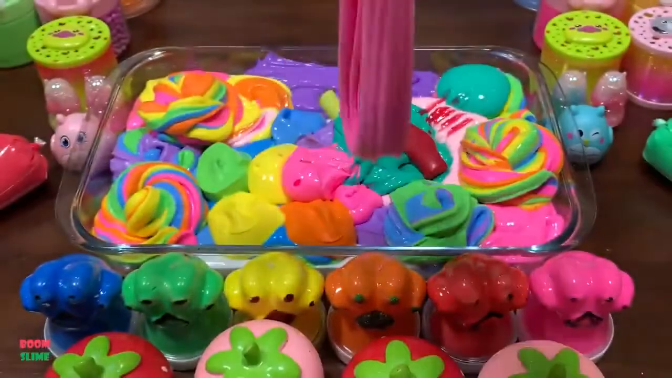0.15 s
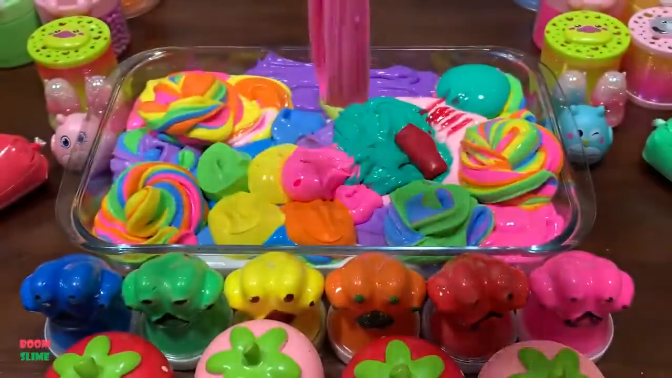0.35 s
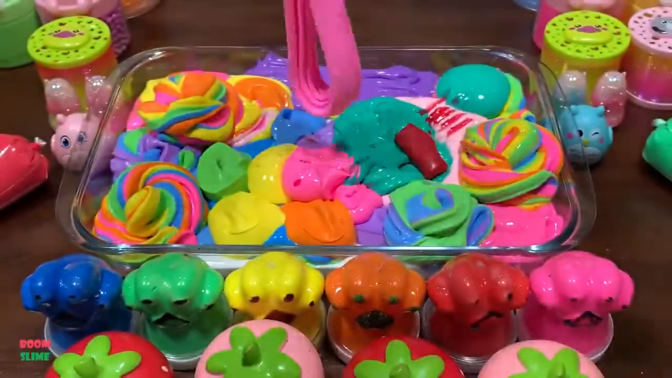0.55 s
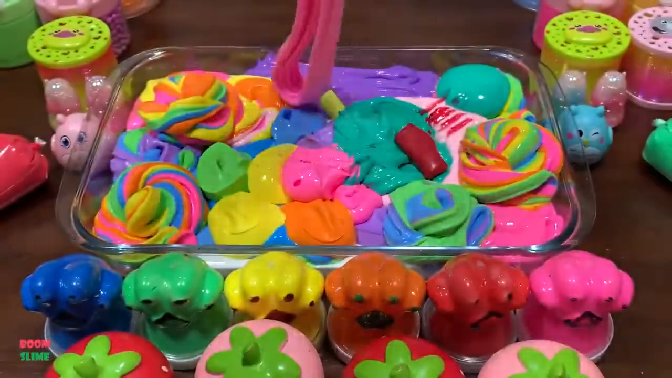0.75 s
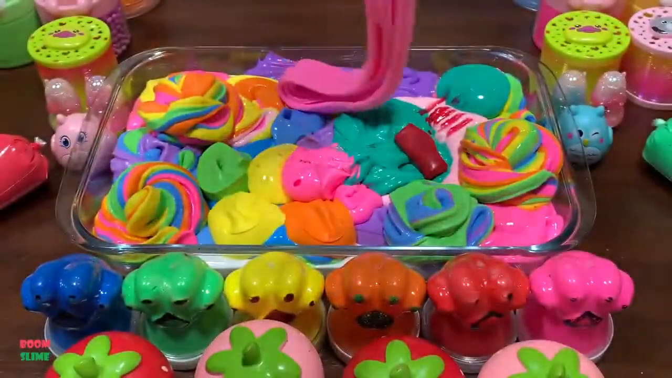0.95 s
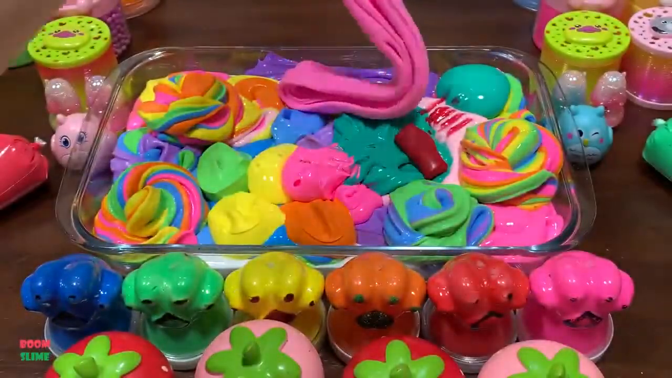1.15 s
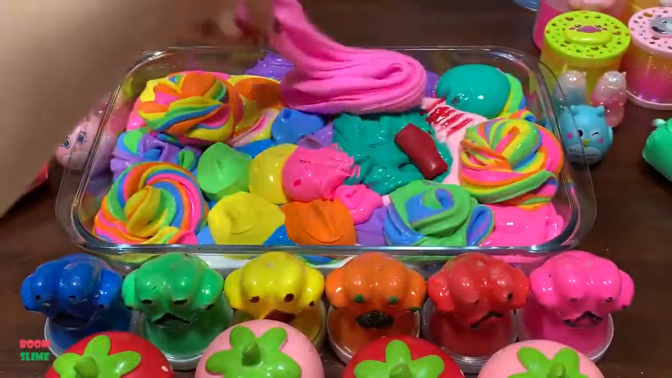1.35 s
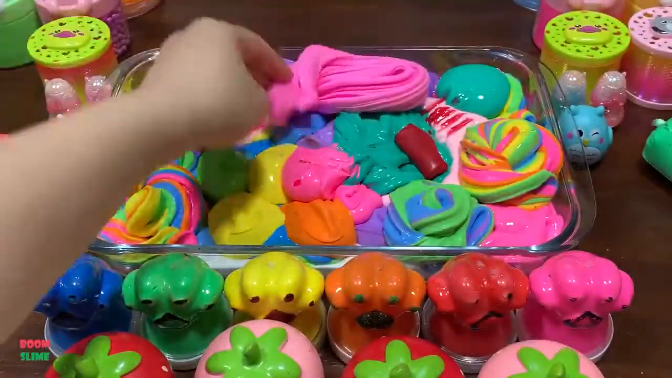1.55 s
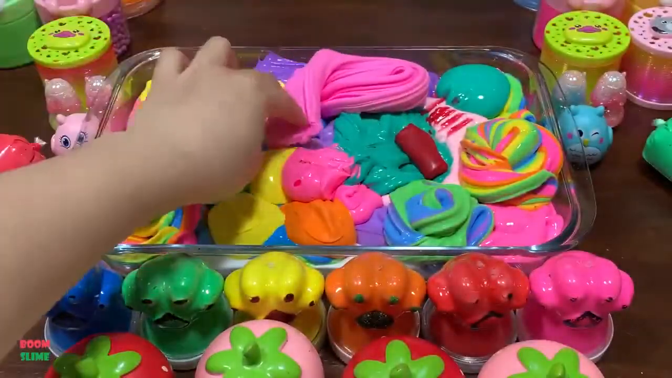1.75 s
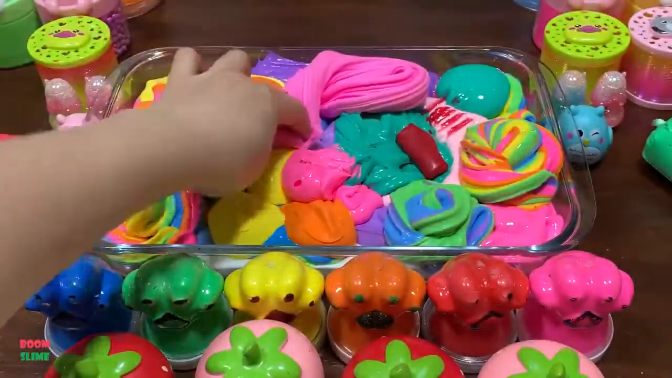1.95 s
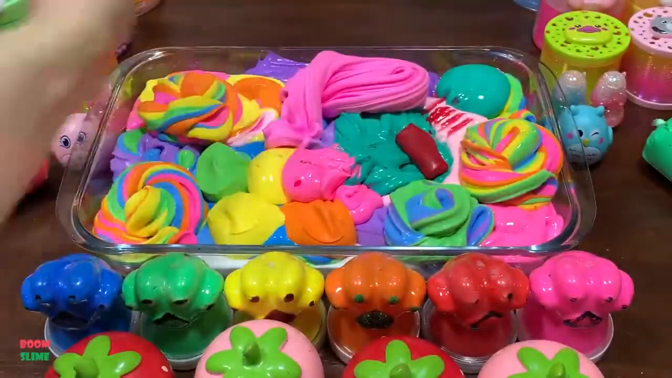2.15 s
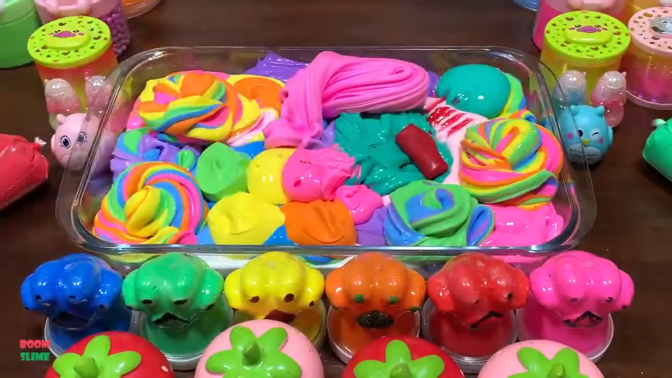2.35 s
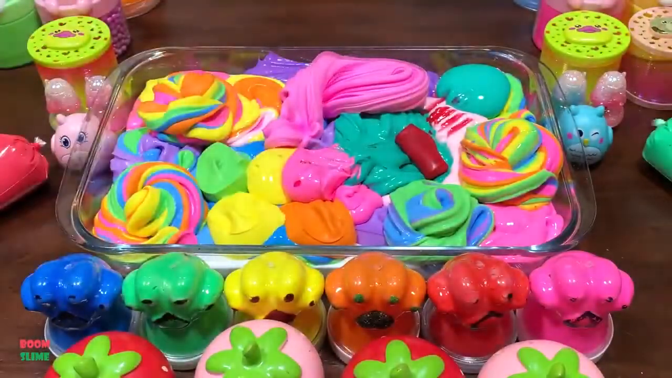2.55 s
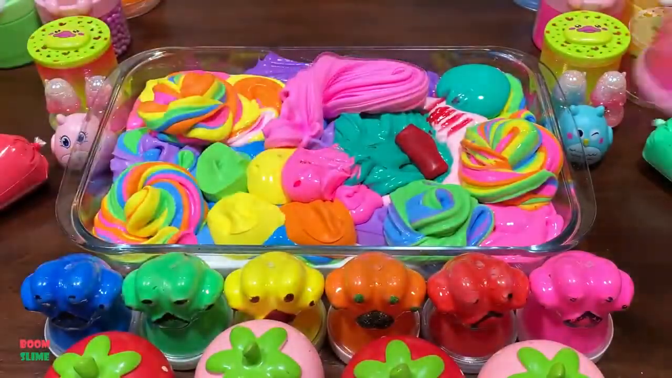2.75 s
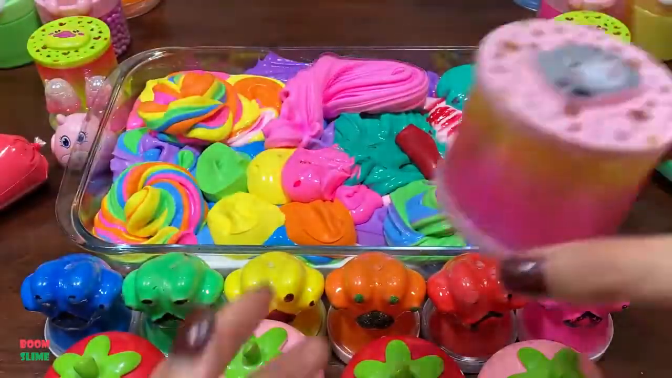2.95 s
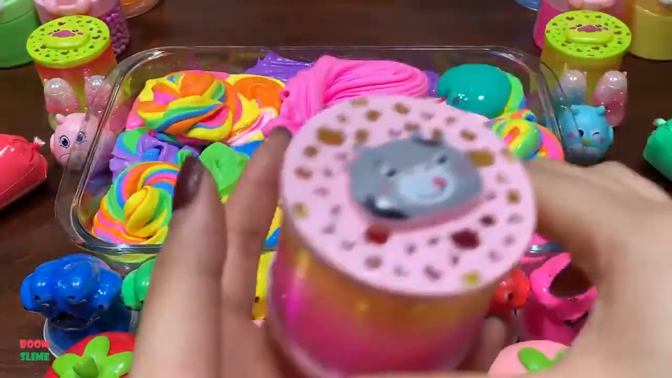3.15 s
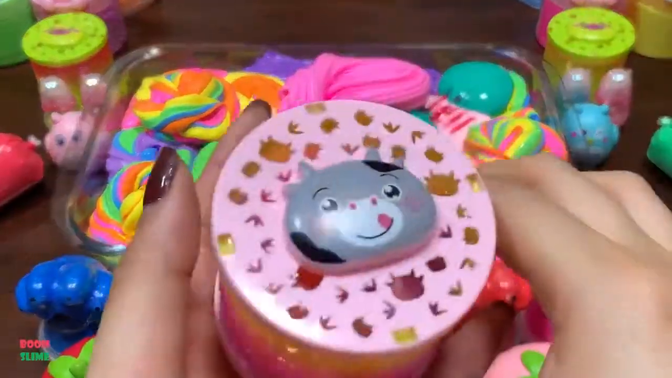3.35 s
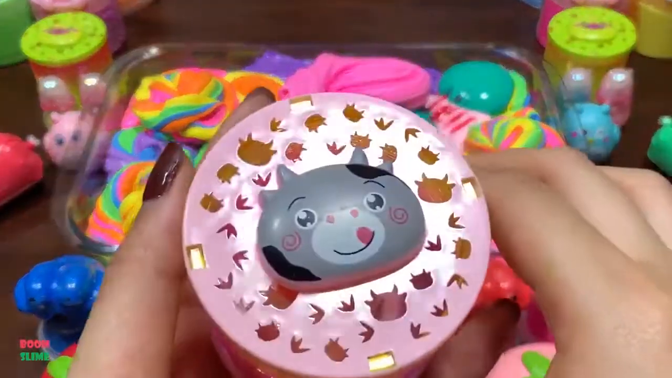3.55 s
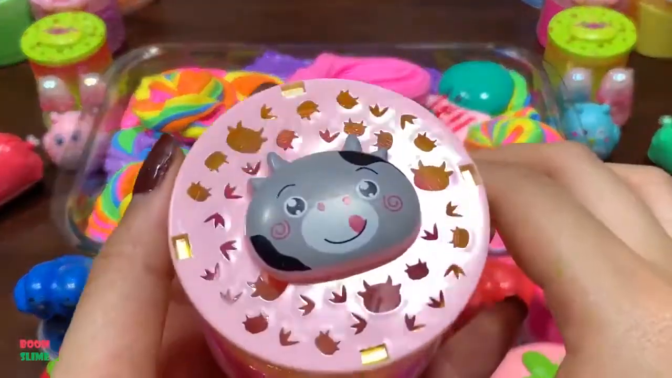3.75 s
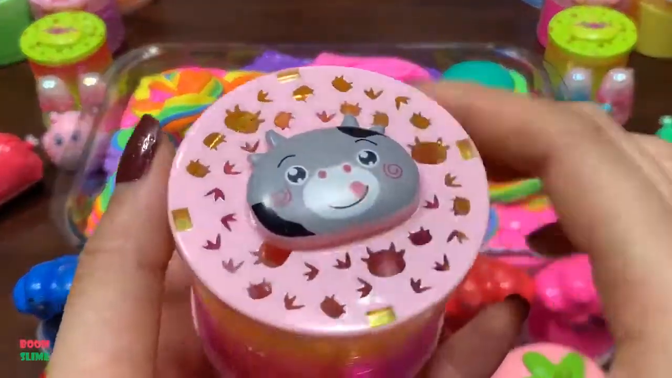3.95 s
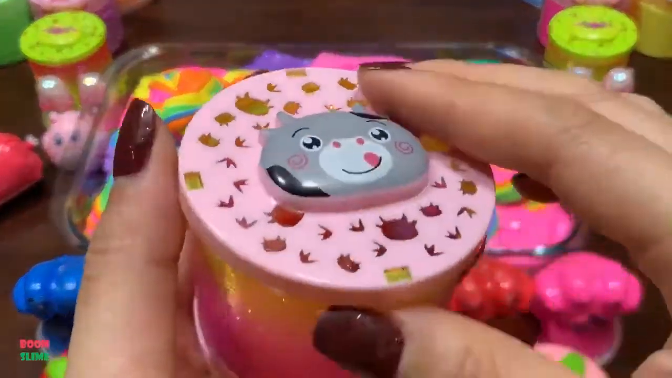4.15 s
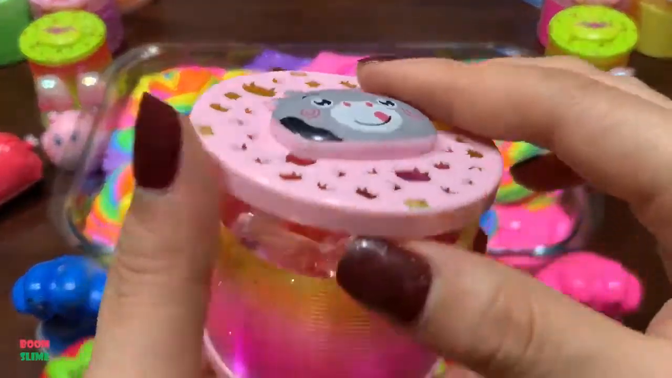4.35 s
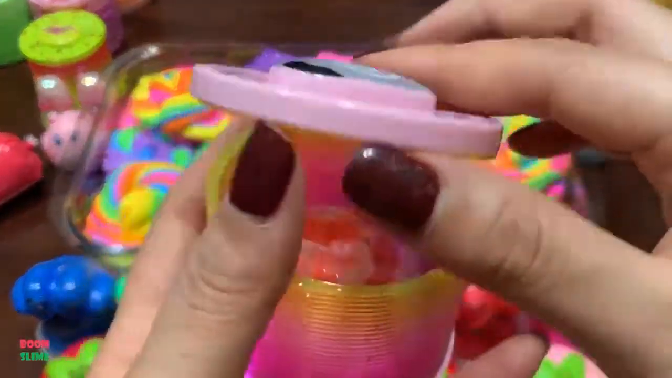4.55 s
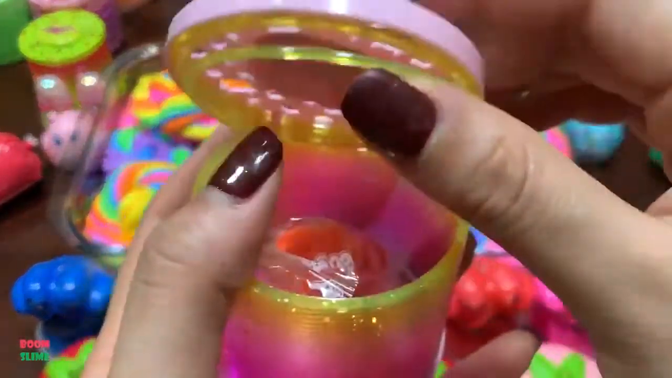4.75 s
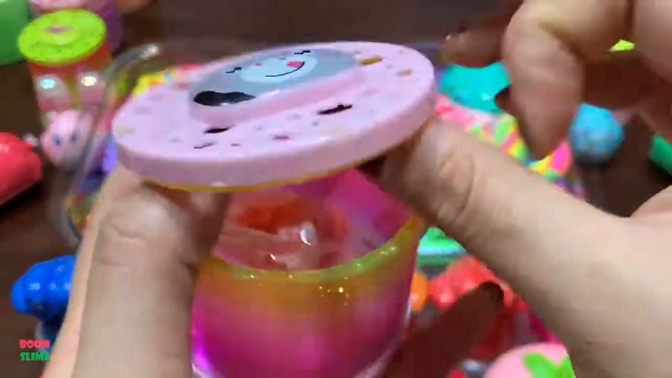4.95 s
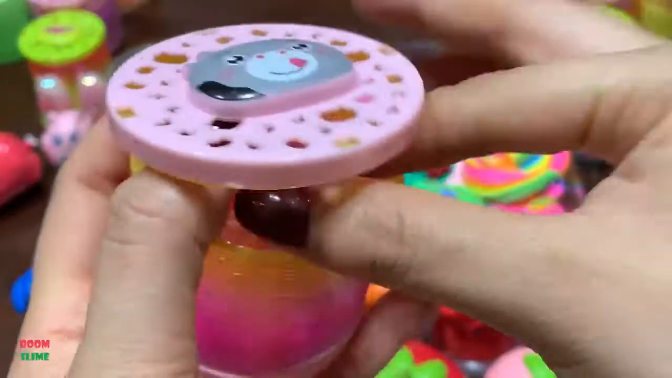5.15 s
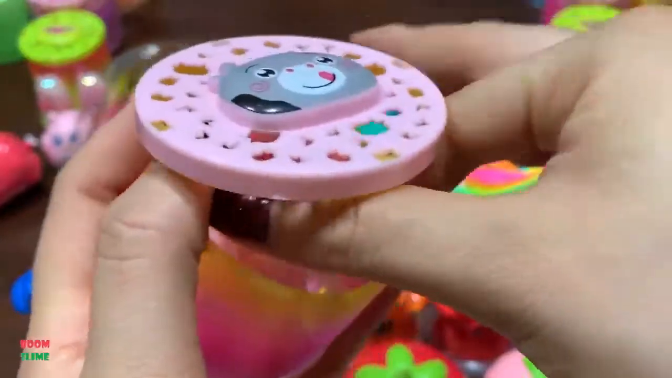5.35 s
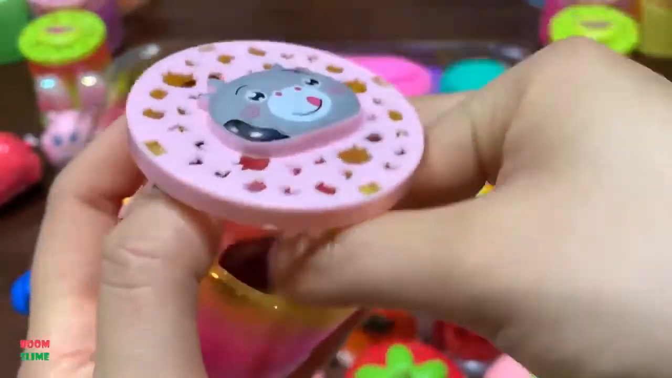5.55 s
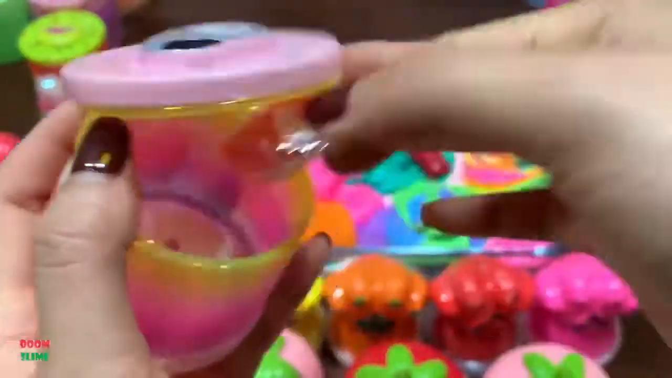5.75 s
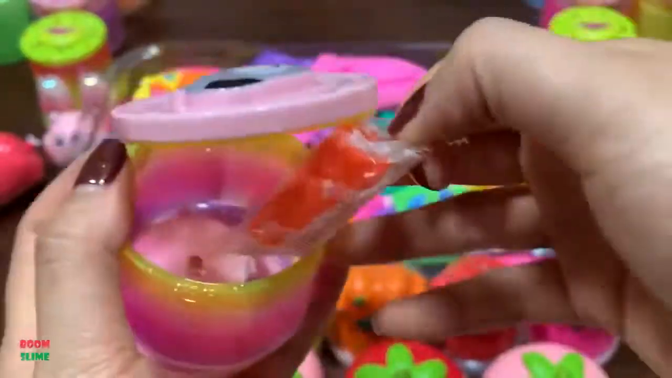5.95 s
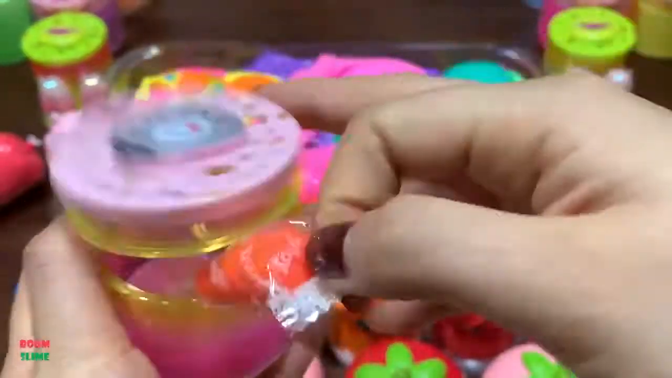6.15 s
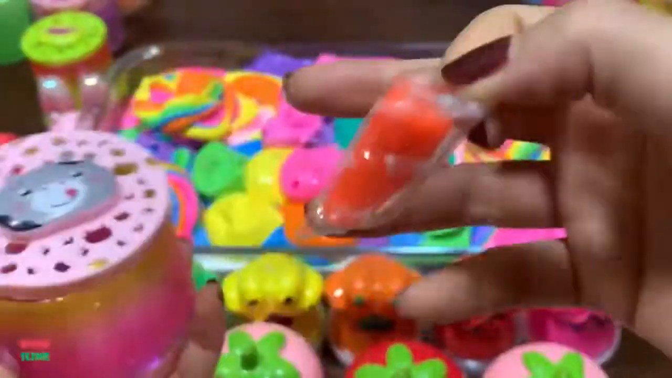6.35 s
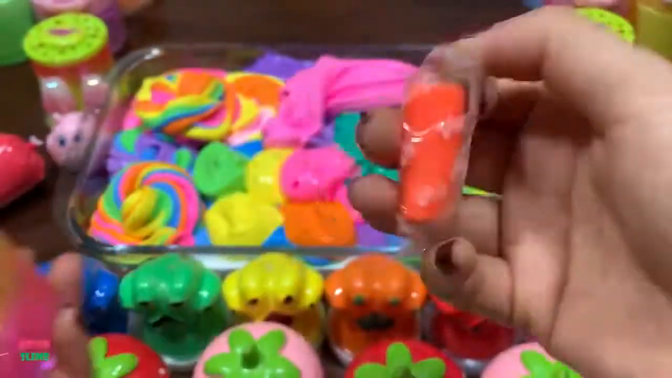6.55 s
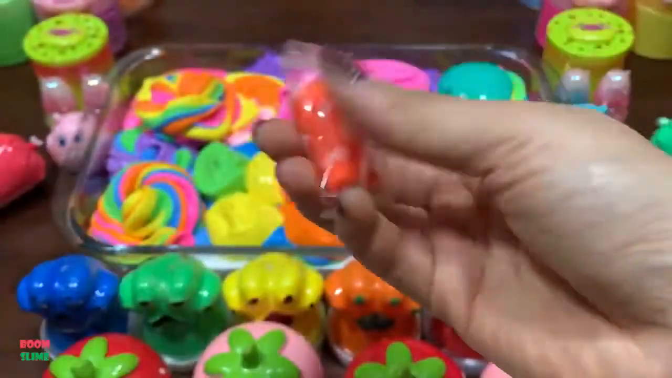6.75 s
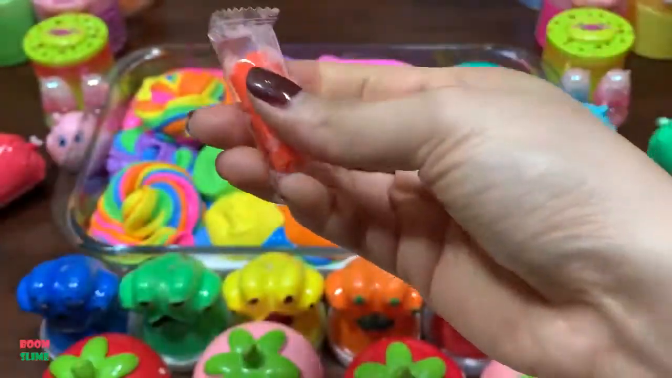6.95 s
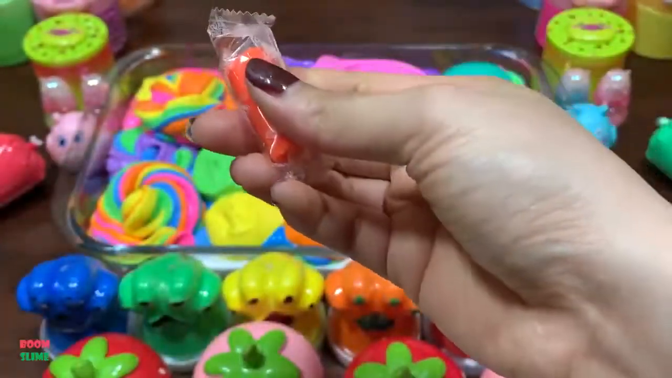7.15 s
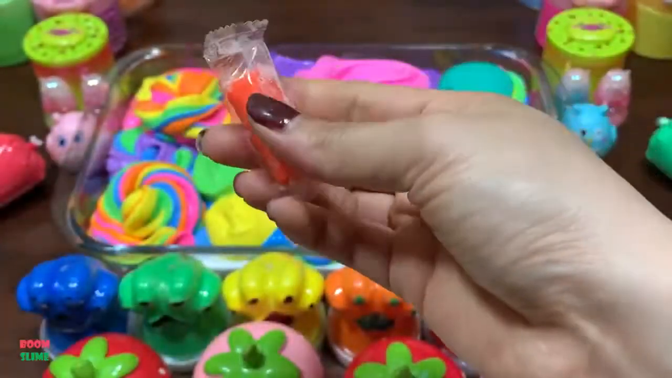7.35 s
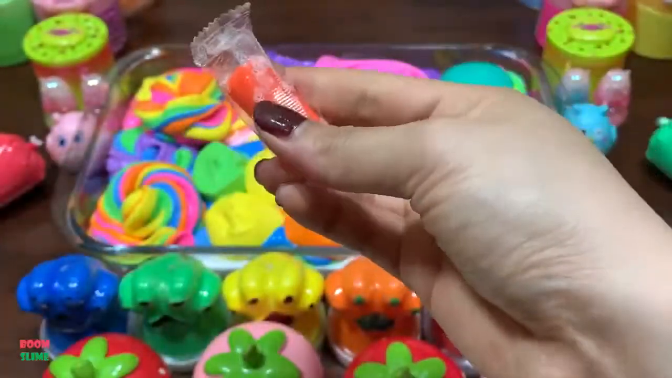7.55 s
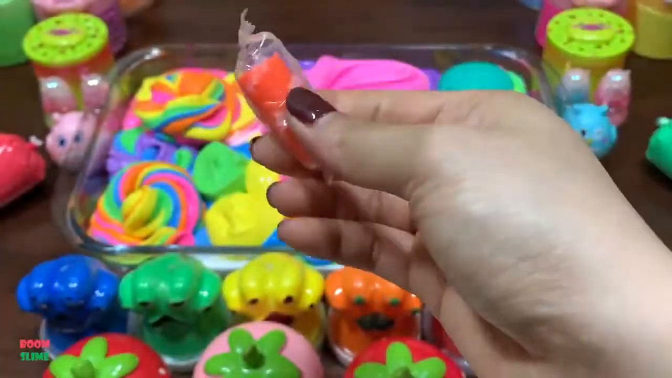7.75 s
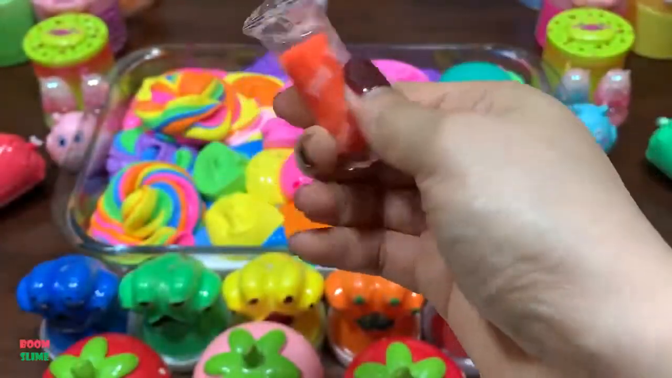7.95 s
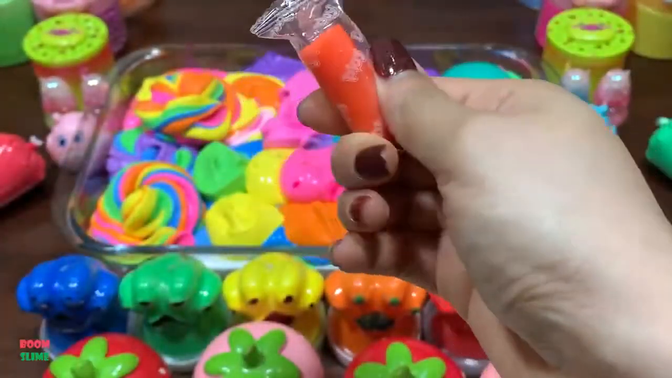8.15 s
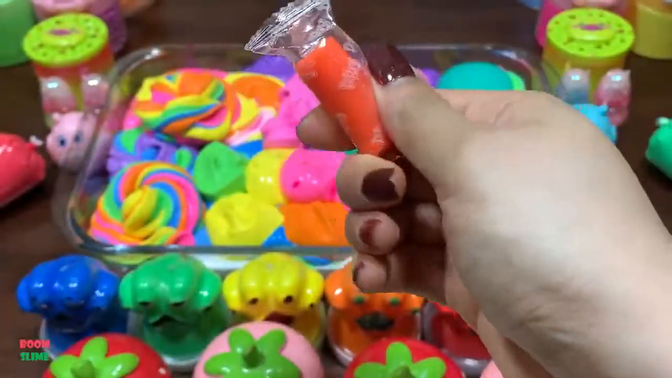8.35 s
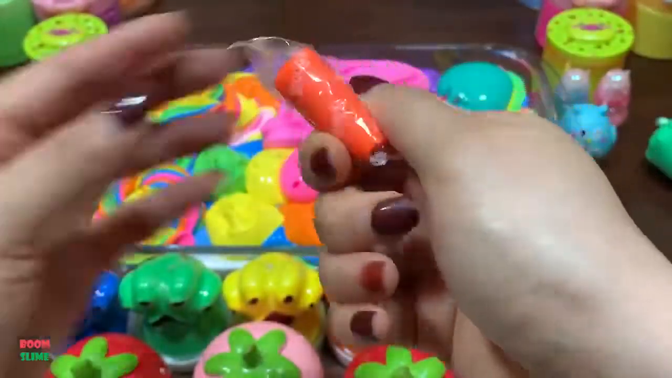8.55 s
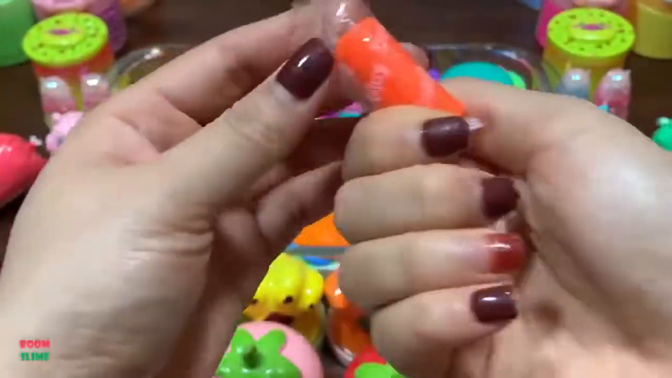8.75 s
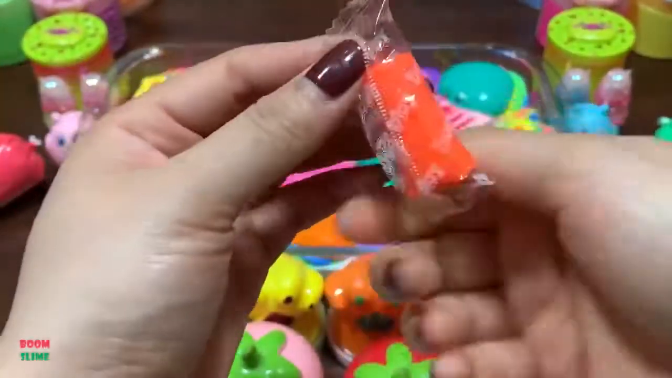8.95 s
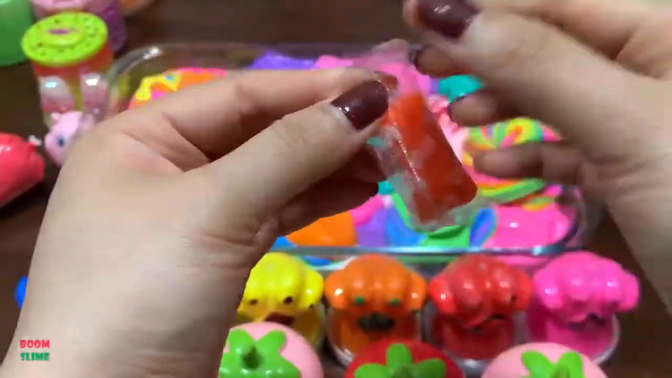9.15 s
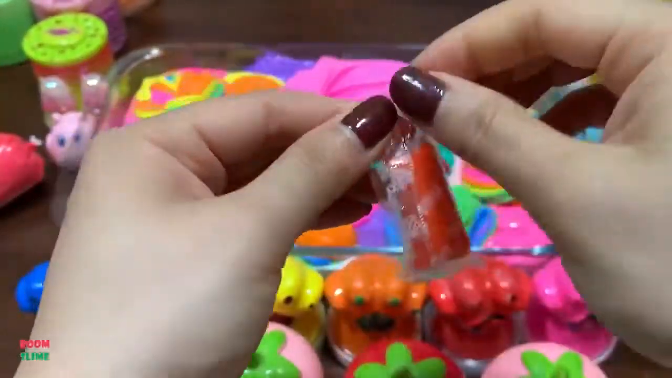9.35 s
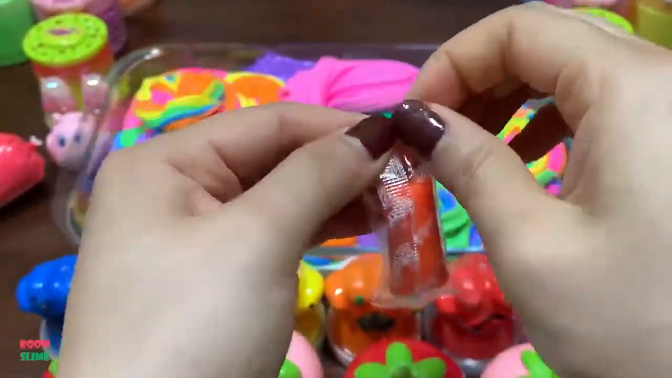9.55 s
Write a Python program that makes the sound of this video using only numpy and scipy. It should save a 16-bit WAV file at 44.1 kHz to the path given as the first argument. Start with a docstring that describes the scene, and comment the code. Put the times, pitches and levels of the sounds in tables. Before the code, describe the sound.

Faint sticky slime taps, then a plastic jar opens with soft scrapes and puffs, and a thin wrapper crinkles sharply in uneven bursts near the microphone.

```python
"""In a small room, hands lay down sticky slime, open a plastic jar and crinkle a thin wrapper near a microphone.
Creases snap as short noise bursts in three bands, each with a ringing panel of film; sticky pulls swell and fade.
Random ticks make the finer rustle, and low swinging tones are fingertip bumps. Shaped noise makes a near brush,
puffs of air, and a quiet hum and hiss. The room echoes the hands, and two microphone ports hear it all in stereo."""
import sys
import numpy as np
from scipy import signal
from scipy.fft import rfft, irfft, next_fast_len
from scipy.io import wavfile

SR = 44100
rng = np.random.default_rng(int(sys.argv[2]) if len(sys.argv) > 2 else 0)


def dump_mix(stems):
    """Bounce the given channels to the path in sys.argv[1] as a 16-bit WAV at rate SR."""
    frames = np.atleast_2d(stems).T  # one column per channel
    limited = np.clip(frames, -1, 1)  # hard clip at full scale
    pcm = np.round(limited * 32767).astype(np.int16)
    wavfile.write(sys.argv[1], SR, pcm)


N = 423360

# hum and hiss: pitch_hz, level_db (per Hz)
FLOOR = [(15, -92), (40, -87), (80, -91.5), (150, -95.5), (300, -102), (600, -107), (1000, -111),
         (2000, -115), (4500, -117), (7000, -119), (12000, -118), (14700, -120), (15300, -124),
         (15800, -150)]
# the lid fans puffs of air at the ports: peak_s, level_db
DRAUGHT = [(4.84, -51), (4.95, -39), (5.11, -50), (5.43, -58), (5.52, -61), (5.64, -60)]
# colour of the puffs, only the shape counts: pitch_hz, level_db (per Hz)
AIR = [(10, -2), (25, 8.5), (60, 0), (120, -21), (200, -81)]
PUFF_RISE_S, PUFF_FALL_S = 0.08, 0.18
# quick strokes brushing past the microphone: peak_s, scratch_db, thump_db
BRUSH = [(2.594, -36, -42), (2.62, -30.5, -26), (2.638, -43.5, -47)]
# colours of scratch and thump, only the shape counts: pitch_hz, level_db (per Hz)
SCRATCH = [(700, 2), (1200, 1), (2200, 8), (4000, -4.5), (9000, -6.5), (13000, -2), (16500, -9)]
THUMP = [(40, -30), (100, -15), (250, 14), (600, 13), (1000, -38)]
SCRATCH_RISE_S, SCRATCH_FALL_S, THUMP_RISE_S, THUMP_FALL_S = 0.03, 0.02, 0.014, 0.014
THUMP_LAG_S = 0.0044  # the thump follows the scratch
# fingertips bump the jar and the packet: start_s, level_db (before boost and damping), pitch_hz (at the start)
BUMPS = [(0.625, -51, 252), (0.92, -55, 390), (5.106, -62, 200), (5.2461, -28.5, 475), (5.612, -46.5, 307),
         (6.048, -53, 149), (6.133, -42, 360), (6.23, -35.5, 454), (6.4984, -38.5, 347), (6.506, -51, 110),
         (6.7175, -32.5, 470), (6.958, -45, 345), (7.027, -34.5, 456), (8.26, -57.5, 147),
         (9.194, -45.5, 460), (9.2705, -28, 496)]
# how long the room rings: pitch_hz, t60_s (time to fade 60 dB)
WALLS = [(300, 0.46), (1400, 0.31), (3500, 0.35), (9000, 0.51), (15000, 0.022)]
# how strongly the room answers: pitch_hz, level_db
ECHO = [(300, -32.5), (1400, -8.5), (3500, -7.5), (8000, -15), (15000, -19)]
# hollow, body and sizzle, the three parts of the film's sound: low_hz, high_hz, snap_t60_s, snap_ring_boost_db
FILM = [(908, 2580, 0.011, 16.5), (2440, 6350, 0.0056, 2.5), (7040, 15000, 0.0021, -6.5)]
BODY_DB, RING_IN_BODY_DB = -2, 7  # body over the mean of its neighbours; more when the panel rings there
# air cupped by hand and jar: pitch_hz, width_hz, level_db
HOLLOW = [(1140, 430, -2.5), (1502, 190, 3.5), (1667, 930, -12), (360, 440, -8.5)]
# the lid drags over the rim of the jar: time_s, level_db
LID = [(4.36, -94), (4.45, -72), (4.58, -71), (4.72, -79), (4.78, -89)]
# each squeeze of the film: peak_s, crackle_db (before trims), rub_db (before a trim), fall_s (time to lose 30 dB)
SQUEEZES = [(2.7, -72, -66, 0.15), (2.79, -78, -63.5, 0.26), (2.868, -43, -53.5, 0.19),
            (4.659, -56.5, -57, 0.16), (4.81, -65, -59.5, 0.19), (5.118, -54, -55.5, 0.15),
            (5.248, -57, -44, .1), (5.4, -48.5, -50, 0.26), (5.639, -41.5, -47, 0.21),
            (5.72, -55.5, -58.5, 0.4), (5.948, -56, -57, 0.16), (6.162, -54, -39.5, 0.28),
            (6.351, -24.5, -40.5, 0.13), (6.57, -47, -49, 0.96), (6.752, -19, -33.5, 0.17),
            (7.038, -43, -50.5, 1), (7.45, -53, -64, 1), (7.58, -35, -48, 0.081), (7.91, -45, -62, .13),
            (8.06, -54.5, -71, 0.98), (8.278, -37, -51, 0.3), (8.49, -37.5, -49.5, 0.26),
            (8.78, -59.5, -79, 0.15), (9.0, -57, -83.5, 0.38), (9.22, -42, -50.5, 0.16),
            (9.48, -27.5, -54.5, 0.14)]
SQUEEZE_RISE = 0.5  # build-up time over fall time
# soft touches and sticky pulls: centre_s, level_db (before a boost), sizzle_over_hollow_db,
# half_width_s (time to fall to 1/e), ring_hz
TOUCHES = [(0.191, -55, 16, 0.01, 3150), (0.384, -70, 3, 0.021, 2160), (0.546, -63.5, -4, 0.005, 2176),
           (0.629, -65, 0, 0.014, 1150), (0.911, -48.5, 8, 0.008, 2950), (1.081, -60, -2, 0.01, 1440),
           (1.611, -61.5, 6, 0.02, 1490), (1.824, -69, 4, 0.01, 2600), (2.083, -53.5, -5, 0.0075, 1420),
           (2.81, -65, -25, .03, 1840), (2.867, -48.5, -13, 0.019, 5400), (3.276, -73, -8, 0.027, 1390),
           (3.448, -68, -10, 0.02, 2180), (3.773, -65, 2, 0.025, 1380), (3.9, -65.5, -6, 0.014, 1300),
           (4.509, -68.5, -5, 0.0093, 1270), (4.792, -71, 13, 0.017, 3200), (5.87, -63.5, 4.5, 0.039, 8500),
           (5.953, -52.5, 7.5, .006, 8000), (7.016, -30, 8, 0.0075, 8930), (8.841, -54, -12, .002, 2000),
           (8.969, -68, -27, 0.057, 2490)]
# creases and sticky pops: start_s, level_db (as if spread over 4 ms), sizzle_over_hollow_db, ring_hz
SNAPS = [(0.9151, -41, -2, 3070), (1.6152, -41, -18, 1420), (2.086, -49.5, 10, 1370),
         (2.3004, -31.5, 29.5, 8800), (2.77, -51, -19, 1580), (2.8666, -38, 9, 9170.0),
         (3.2783, -51, -28, 1440), (4.6693, -54, -20, 1380.0), (4.7853, -41.5, -36, 1530),
         (4.79, -44.0, -35, 1360), (4.8377, -52, 1, 1380.0), (5.102, -39.5, 2, 1130),
         (5.2226, -38.5, -6, 1280), (5.2277, -38, 12, 5300), (5.2444, -30, 12.5, 1240),
         (5.3556, -46.5, 11.0, 7240.0), (5.3865, -36, 7, 1140), (5.401, -38, 3, 1710),
         (5.406, -34, 10, 1060), (5.4981, -41, -4, 1280), (5.514, -41, 0, 1610), (5.5258, -33, 8, 1250),
         (5.5952, -29.5, 8, 1380.0), (5.6126, -25.5, 4.5, 1140), (5.6215, -31.5, 1, 1180),
         (5.639, -33.5, 24, 8180.0), (5.7347, -43.5, 16, 7900), (5.768, -48, 10.0, 1260),
         (5.9349, -42.5, 9, 1300), (6.047, -37, 8, 1680), (6.0551, -26, -2.5, 1410),
         (6.0818, -31, 27, 7900), (6.11, -33.5, 8, 3520), (6.123, -34.5, -20, 1510), (6.1283, -18, 6, 3800),
         (6.137, -14, 9, 9130.0), (6.15, -19.5, 9, 5300), (6.1551, -17, 11, 5960), (6.168, -28, 14, 1680.0),
         (6.1846, -31, 0, 1590.0), (6.1972, -27.0, 4, 1640), (6.2274, -22.5, 1, 1750),
         (6.2318, -10, 13.5, 8470), (6.2456, -21.5, -12, 1520), (6.2652, -16.0, 12, 4500),
         (6.322, -28, 4, 1350), (6.3308, -20.5, 14, 1900), (6.348, -26.5, 7, 8460),
         (6.3703, -22.5, 9.5, 7100), (6.4201, -32, -7, 2460), (6.4514, -26.5, 10.5, 2540),
         (6.4976, -33, 5.0, 9100), (6.5113, -28.0, 8.5, 8530.0), (6.576, -29, -3.5, 1850.0),
         (6.5911, -31, 8, 4500), (6.6132, -16, 28, 8830.0), (6.63, -26, 9, 8790.0),
         (6.6564, -16.0, 16.5, 8850), (6.6844, -32.5, 19, 5810.0), (6.7154, -15, 12.5, 8660.0),
         (6.7193, -19, 10, 7300), (6.7274, -15, 14, 2190), (6.7422, -23.5, 28, 8140.0),
         (6.7734, -13, 19.5, 7360.0), (6.7884, -23, 14, 1600), (6.819, -20.5, 29, 8440.0),
         (6.828, -31.5, 9.0, 5860.0), (6.8432, -27.5, 7.5, 1700), (6.8534, -26.5, 9, 5230),
         (6.9241, -33, 17, 9200), (6.9319, -33, 10, 8350.0), (6.9571, -35, -2, 1880),
         (7.0063, -18.0, 24, 9800), (7.0257, -24.5, -20, 1270), (7.059, -33.0, 9, 1400),
         (7.1582, -35.5, -22, 2600), (7.1723, -34, 3, 2360), (7.2124, -42.5, 13, 2580),
         (7.2217, -33.0, -1, 1470), (7.252, -41.5, 17, 5000.0), (7.312, -38, -7, 1560),
         (7.3301, -37, -11, 1380), (7.3588, -33.5, -0.5, 1970), (7.392, -29, 10, 6580),
         (7.411, -30, -3, 3000), (7.4176, -31.5, -5, 7100), (7.43, -26.0, 0.5, 2120),
         (7.4576, -30, 1, 5210.0), (7.4723, -22, 14, 7260), (7.5328, -31, 7, 5940.0),
         (7.5592, -31.5, 2, 4310.0), (7.5895, -29, 0, 2410.0), (7.8575, -51, 39, 8900),
         (7.885, -42, 16, 4700), (7.9042, -45.5, 1, 7320.0), (7.918, -48.5, 7, 9220.0),
         (7.9593, -49.5, -12, 2040), (8.0263, -32.5, 5.5, 9000), (8.0516, -38.5, 14, 9200),
         (8.1895, -32.5, 9.5, 7400), (8.2463, -27, 3.5, 4570), (8.278, -16.0, 17, 4100),
         (8.3048, -33.5, -1, 4600), (8.3152, -35, 18, 5400), (8.3697, -26.5, 5, 4670),
         (8.4566, -28, 21, 9200), (8.4701, -25, -7.5, 4000), (8.4791, -21, 27, 8200),
         (8.489, -19, 4.5, 2010), (8.5, -33, 18, 8000), (8.5059, -24, 4, 5640),
         (8.7522, -35.5, -15.5, 1950), (9.061, -41.5, 6, 4570), (9.196, -30.5, -3.5, 1980.0),
         (9.204, -28, -18, 3270.0), (9.207, -32.5, -2, 2200), (9.2522, -44, 16, 8700),
         (9.2684, -23.5, -6.5, 930), (9.2759, -23, 3, 4800), (9.283, -45, 20, 7500),
         (9.3205, -23, 14, 4900), (9.3444, -33, 15, 4740.0), (9.3852, -28, -4, 2840.0),
         (9.4094, -15.5, 18.5, 4100), (9.416, -32.5, 19, 9470.0), (9.4546, -25.5, 21, 6500),
         (9.461, -26.5, 5.5, 2220), (9.4965, -34.5, -5, 1810), (9.512, -35, 4, 4870),
         (9.5534, -35, 5, 4000), (9.568, -43.5, 11, 7670.0), (9.597, -30.0, 10.5, 4060)]
JAR_AWAY_S = 6.55  # until then the film is cramped inside the jar
TWITCH_IN_JAR, TWITCH_IN_HAND = 0.15, 0.078  # after-twitching over the snap
# how alike the ports hear unrelated noise: pitch_hz, likeness (1 = the same)
ALIKE = [(60, .94), (150, .98), (400, .97), (900, .65), (2000, .55), (6000, .45), (8000, .6), (9000, .88)]
# how far the left port leads: pitch_hz, lead_radians
LEAD = [(0, 0), (500, 0), (1200, -1.4), (1600, -1), (2200, 3), (2900, 2.5), (3700, 5.2), (5200, 4.8),
        (7200, 8.6), (9300, 6.3), (16300, -3.8)]
# balance of the ports: pitch_hz, left_over_right_db
LEAN = [(400, 0), (700, 5), (1300, 7), (2400, 3), (4400, 1.5), (8000, 0)]
# treble peak and roll-off of the microphone: pitch_hz, level_db
CAPSULE = [(10000, 0), (13000, 1), (14800, 0), (15600, -1), (16500, -12.5)]
TOP_HZ = 16650  # nothing is heard above this


def amp(db):
    """Gain of a level in dB."""
    return 10 ** (np.asarray(db) / 20)


def unit(x):
    """Brings x to an average strength (rms) of 1."""
    return x / np.sqrt(np.mean(x ** 2) + 1e-20)


def along(points, hz):
    """Reads a (pitch, value) curve, with pitch on a log axis."""
    f, v = np.transpose(points)
    return np.interp(np.log(hz + 1), np.log(f + 1), v)


def filtered(x, response):
    """Passes x through a response that depends on frequency."""
    size = next_fast_len(x.shape[-1] + 2048)
    spectrum = rfft(x, size) * response(np.fft.rfftfreq(size, 1 / SR))
    return irfft(spectrum, size)[..., :x.shape[-1]]


def tinted(x, colour):
    """Colours x by a (pitch, dB) curve, at rms 1."""
    return unit(filtered(x, lambda hz: amp(along(colour, hz))))


def noise():
    """Two unrelated white noises; the ports mix them later."""
    return rng.standard_normal((2, N))


def placed(times, bursts):
    """Adds one short stereo burst at each time."""
    out = np.zeros((2, N + bursts.shape[-1]))
    for s, burst in zip(times, bursts):
        start = round(s * SR)
        out[:, start:start + burst.shape[-1]] += burst
    return out[:, :N]


def swells(peak_s, peak_db, rise_s, fall_s):
    """Gain of gestures that climb 30 dB in rise_s and lose 30 dB in fall_s; their powers add."""
    t = np.arange(0, N, 32) / SR
    power = 0
    for s, db, rise, fall in np.broadcast(peak_s, peak_db, rise_s, fall_s):
        drop_db = 30 * np.maximum((s - t) / rise, (t - s) / fall)
        power = power + amp(db - drop_db) ** 2
    return np.interp(np.arange(N) / SR, t, np.sqrt(power))


def resonance(f, centre_hz, width_hz):
    """A resonance passes most at its centre and turns the phase on either side."""
    return 1j * f * width_hz / (centre_hz ** 2 - f * f + 1j * f * width_hz)


def band(x, k):
    """Keeps part k of the film's sound: 0 hollow, 1 body, 2 sizzle."""
    low_hz, high_hz = FILM[k][:2]
    sos = signal.butter(3, [low_hz, high_hz], "bandpass", fs=SR, output="sos")
    return signal.sosfilt(sos, x)


def voiced(x, k, ring_hz, sharpness, boost_db):
    """Part k of the sound, with a panel of film ringing at ring_hz."""
    def ring(f):
        return 1 + amp(boost_db) * resonance(f, ring_hz, ring_hz / sharpness)
    return filtered(band(x, k), ring)


def shares(level_db, tilt_db, ring_hz):
    """Splits a level among hollow, body and sizzle, so that their powers add up to it."""
    in_body = (ring_hz > FILM[1][0]) & (ring_hz < FILM[1][1])
    parts_db = np.array([-tilt_db / 2, BODY_DB + RING_IN_BODY_DB * in_body, tilt_db / 2])
    return level_db + parts_db - 10 * np.log10(np.sum(amp(parts_db) ** 2, axis=0))


def hum_and_hiss():
    """Steady noise shaped by its level at each frequency."""
    return filtered(noise(), lambda hz: amp(along(FLOOR, hz)) * np.sqrt(SR / 2))


def draught():
    """Puffs of air at the ports: low noise that swells and fades."""
    puffs = swells(*np.transpose(DRAUGHT), PUFF_RISE_S, PUFF_FALL_S)
    return puffs * tinted(noise(), AIR)


def brush():
    """Scratchy strokes, each with a low thump; close to the microphone and dry, without echo."""
    s, scratch_db, thump_db = np.transpose(BRUSH)
    scratch = swells(s, scratch_db, SCRATCH_RISE_S, SCRATCH_FALL_S)
    thump = swells(s + THUMP_LAG_S, thump_db, THUMP_RISE_S, THUMP_FALL_S)
    return scratch * tinted(noise(), SCRATCH) + thump * tinted(noise(), THUMP)


def bumps():
    """A soft contact: a low swing that starts gently, sags in pitch and loses 20.1 dB per starting cycle."""
    s, level_db, hz = np.transpose(BUMPS)[:, :, None]
    t = np.arange(2000) / SR
    damping = amp(level_db + 16.5 - 20.1 * hz * t)
    swing = np.sin(2 * np.pi * hz * t * np.exp(-t / 0.25))
    bump = damping * swing * (1 - np.exp(-t / 0.0022))
    return placed(s[:, 0], np.repeat(bump[:, None], 2, axis=1))


def room(x, piece_s=.3):
    """Each frequency dies at its own speed; the hands move, so the echo pattern changes with every piece."""
    out, step = np.zeros((2, N + SR)), round(piece_s * SR)
    for start in range(0, N, step):
        hz, t, grid = signal.stft(rng.standard_normal((2, SR // 2)), SR, nperseg=256)
        fading = amp(-60 * t / along(WALLS, hz)[:, None])
        tail = signal.istft(grid * fading, SR, nperseg=256)[1]
        tail *= 1 - np.exp(-np.arange(tail.shape[1]) / SR / 0.00043)  # soft start
        tail /= np.linalg.norm(tail[0])
        echo = signal.fftconvolve(x[:, start:start + step], tail, axes=1)
        out[:, start:start + echo.shape[1]] += echo
    return filtered(out[:, :N], lambda hz: amp(along(ECHO, hz)))


def lid_drag():
    """Gain of the lid's scrape, silent outside its rows."""
    s, level_db = np.transpose(LID)
    return amp(np.interp(np.arange(N) / SR, s, level_db, left=-150, right=-150))


def tick_swell(rate, t60):
    """Uneven strength of tiny creases: random ticks, rate per second, each fading 60 dB in t60 seconds."""
    sizes = amp(8.1 * rng.exponential(size=N).clip(0, 3.5))
    ticks = (rng.random(N) < rate / SR) * sizes
    return unit(signal.fftconvolve(ticks, amp(-60 * np.arange(1500) / SR / t60))[:N])


def cupped_air(f):
    """Air cupped by hand and jar: resonances of alternating sign."""
    return sum((-1) ** k * amp(db) * resonance(f, c, w) for k, (c, w, db) in enumerate(HOLLOW))


def rustle():
    """Many tiny creases of uneven size and colour; skin rub and lid drag sound in the hollow."""
    s, crackle_db, rub_db, fall_s = np.transpose(SQUEEZES)
    crackle = swells(s, crackle_db, SQUEEZE_RISE * fall_s, fall_s)
    rub = swells(s, rub_db, SQUEEZE_RISE * fall_s, fall_s)
    common = tick_swell(220, 0.0086)  # moves all three parts together
    body = band((.7 * common + .8 * tick_swell(350, .009) + .7) * noise(), k=1)
    sizzle = band((.7 * common + .6 * tick_swell(350, .006) + .7) * noise(), k=2)
    hollow = filtered((.4 * common + tick_swell(90, .03) + .9) * noise(), cupped_air)
    fine = amp(-10.5) * unit(body) + amp(-7.5) * unit(sizzle)
    return crackle * fine + (rub * amp(-1.0) + lid_drag()) * unit(hollow)


def touches():
    """Soft touches and sticky pulls: noise under a peaked swell, with a ringing panel."""
    s, level_db, tilt_db, half_width_s, ring_hz = np.transpose(TOUCHES)[:, :, None, None]
    levels_db = shares(level_db, tilt_db, ring_hz)
    lead = .15  # s of burst before the centre
    t = np.arange(round(2 * lead * SR)) / SR - lead
    draws = rng.standard_normal((len(s), len(FILM), 2, len(t)))
    bursts = 0
    for k in range(len(FILM)):
        part = voiced(draws[:, k], k, ring_hz, sharpness=6.4, boost_db=20)
        # the crest stands above the mean level, hence 4.5 dB more
        bursts = bursts + amp(levels_db[k] + 4.5) * part / part.std(axis=2, keepdims=True)
    return placed(s.ravel() - lead, bursts * np.exp(-abs(t) / half_width_s))


def snaps():
    """A crease snaps sharply and twitches after; its low part rings longest."""
    s, level_db, tilt_db, ring_hz = np.transpose(SNAPS)
    levels_db = shares(level_db, tilt_db, ring_hz)
    lead = .003  # s of burst before the snap
    t = np.arange(1024) / SR - lead
    before, after = np.minimum(t, 0), np.maximum(t, 0)
    draws = rng.standard_normal((len(s), len(FILM), 2, len(t)))
    twitch = np.where(s < JAR_AWAY_S, TWITCH_IN_JAR, TWITCH_IN_HAND)[:, None, None]
    # a steep rise over a faint, slower one
    rise = amp(60 * np.minimum(t - .0003, 0) / .0018) + .08 * amp(60 * before / .012)
    bursts = 0
    for k, (_, _, t60, boost_db) in enumerate(FILM):
        fall = amp(-60 * after / t60) + twitch * amp(-60 * after / 0.043)
        part = voiced(draws[:, k] * rise * fall, k, ring_hz[:, None, None], sharpness=8.4, boost_db=boost_db)
        power = np.sum(part ** 2, axis=2, keepdims=True) / (SR / 250)  # spread over 4 ms
        bursts = bursts + amp(levels_db[k])[:, None, None] * part / np.sqrt(power)
    return placed(s - lead, bursts)


def scene():
    """Hands and their echo, with hum and hiss, bumps, the near brush and puffs of air."""
    hands = snaps() + touches() + rustle()
    return hands + room(hands) + hum_and_hiss() + bumps() + brush() + draught()


def record(dry):
    """The two ports share part of the sound, each with its own phase and balance; the loudest peaks flatten."""
    def mix(hz):
        turn = np.arccos(np.clip(along(ALIKE, hz), -1, 1)) / 2
        return np.array([np.cos(turn), np.sin(turn)])

    def ports(hz):
        # each port takes half of the lean and half of the lead
        half = amp(along(LEAN, hz) / 2) * np.exp(.5j * np.interp(hz, *np.transpose(LEAD)))
        return np.array([half, 1 / half]) * amp(along(CAPSULE, hz))

    shared, apart = filtered(dry, mix)
    heard = filtered(np.array([shared + apart, shared - apart]), ports)
    clipped = heard / (1 + abs(heard / .93) ** 6) ** (1 / 6)
    return filtered(clipped, lambda hz: hz < TOP_HZ)


dry = scene()
out = record(dry)
dump_mix(out)
```